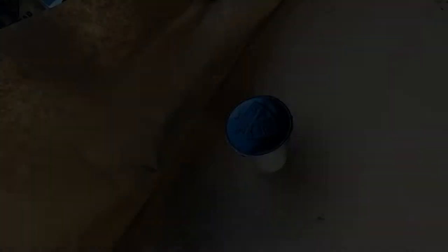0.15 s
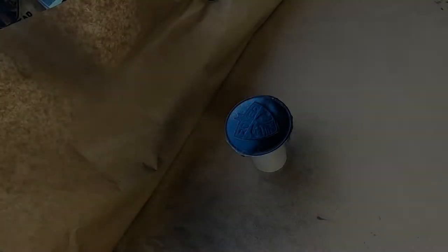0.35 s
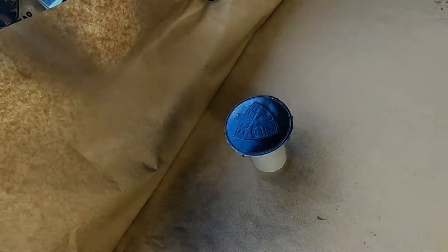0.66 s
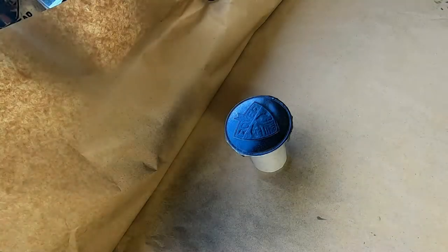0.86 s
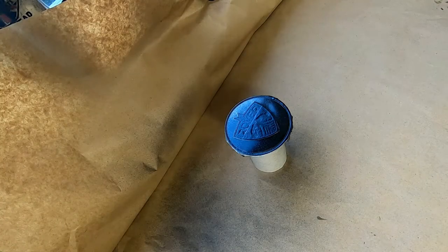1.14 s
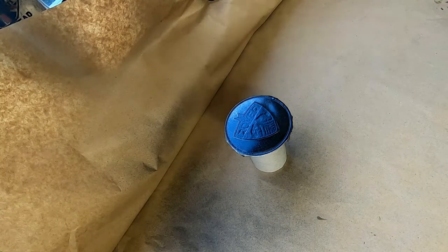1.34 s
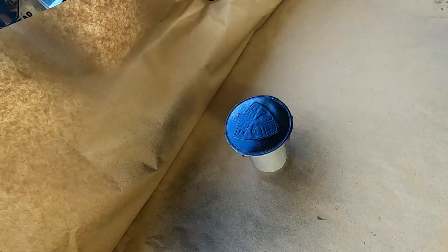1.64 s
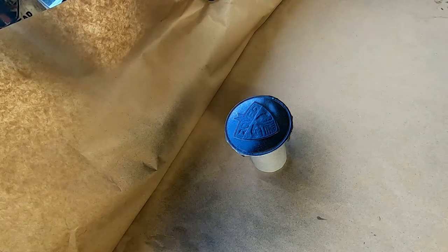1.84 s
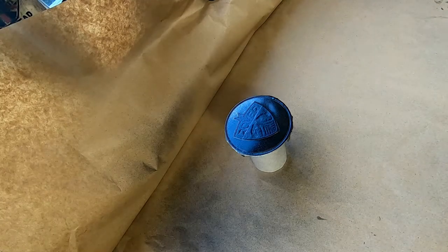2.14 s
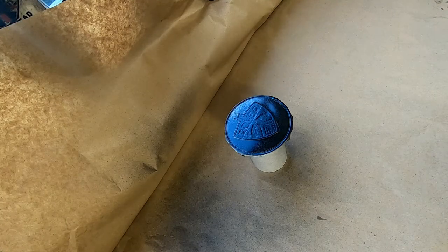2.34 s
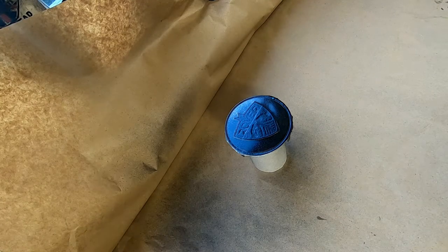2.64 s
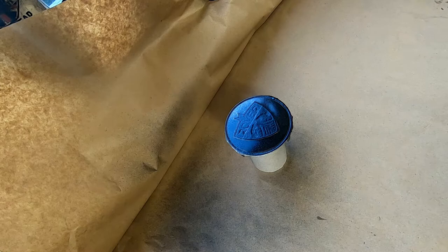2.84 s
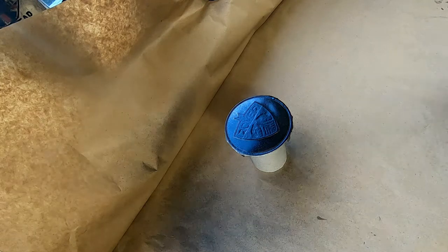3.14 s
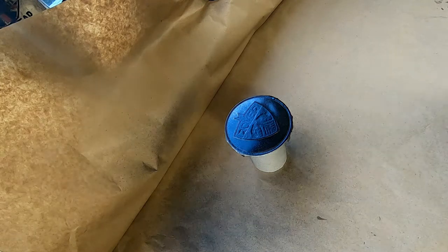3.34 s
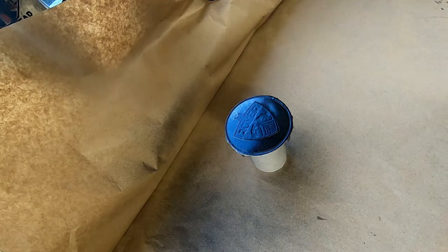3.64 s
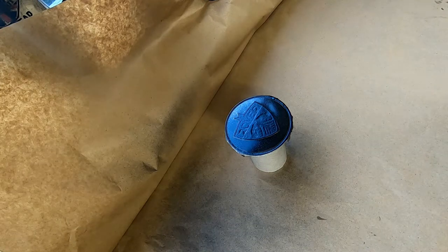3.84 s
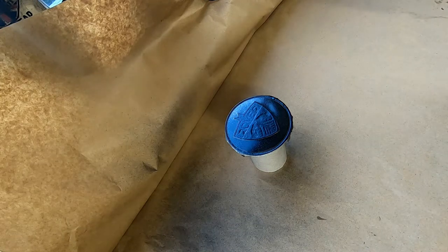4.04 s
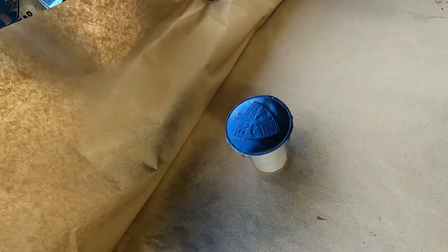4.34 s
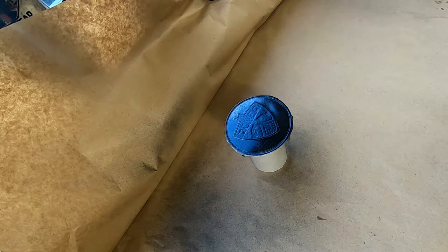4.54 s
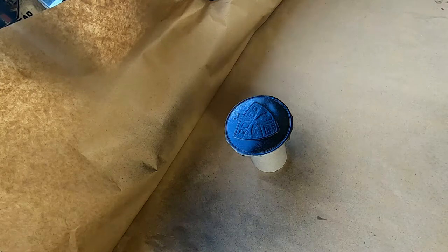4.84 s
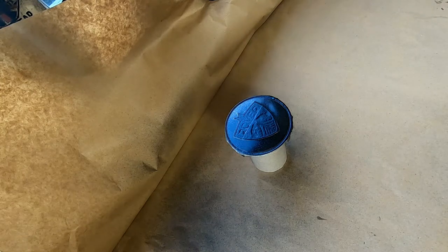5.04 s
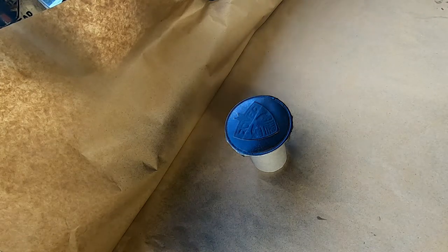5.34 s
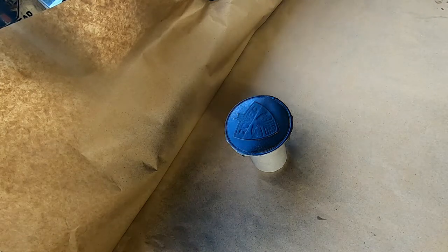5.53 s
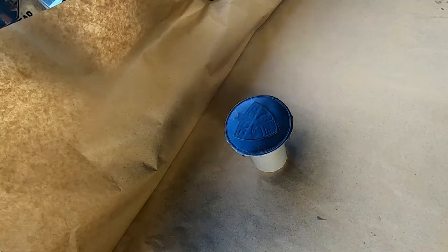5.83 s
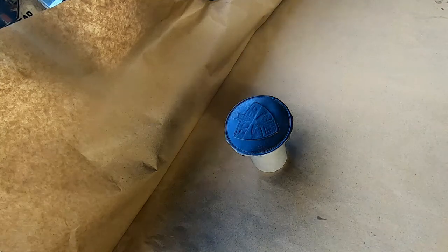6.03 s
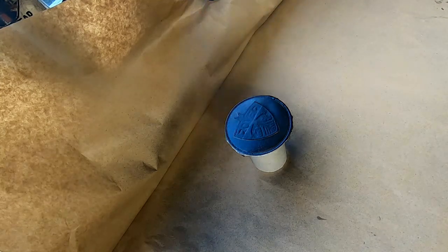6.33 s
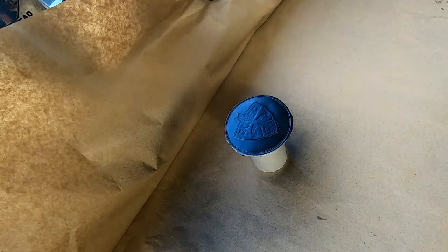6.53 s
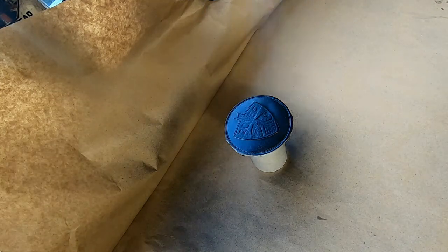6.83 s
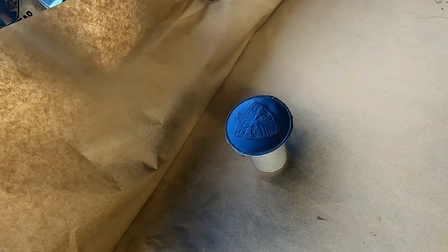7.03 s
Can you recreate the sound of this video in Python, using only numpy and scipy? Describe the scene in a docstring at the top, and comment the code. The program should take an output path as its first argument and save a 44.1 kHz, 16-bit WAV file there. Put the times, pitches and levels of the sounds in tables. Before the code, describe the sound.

A spray paint can is shaken twice, its mixing ball clacking, then sprayed in five short hisses in a small workshop.

```python
"""A small workshop, with a spray paint can close to the microphone and a little to the right.
Faint room noise and a low hum lie under the scene and drop out briefly at the start. From 0.3 s the can
is tilted, then shaken in two spells: the mixing ball rolls in the paint and clacks on the steel.
From 4.7 s five short bursts of turbulent spray hiss at a cap standing on paper on the table;
between them the can tilts and the ball tumbles. The walls answer with a short decay."""
import sys
import numpy as np
from scipy import signal
from scipy.fft import rfft, irfft, next_fast_len
from scipy.io import wavfile
from scipy.ndimage import uniform_filter1d

SR = 44100
rng = np.random.default_rng(int(sys.argv[2]) if len(sys.argv) > 2 else 0)


def to_wav(s):
    """Save 16-bit WAV."""
    ch = np.atleast_2d(s).T  # columns
    pcm = np.round(np.clip(ch, -1, 1) * 32767)  # PCM
    wavfile.write(sys.argv[1], SR, pcm.astype(np.int16))


N = 316620
TIME = np.arange(N) / SR


def amp(db):
    """Decibels to gain."""
    return np.exp(np.asarray(db) * (np.log(10) / 20))

def unit(x):
    """Scale to rms 1."""
    return x / np.sqrt(np.mean(x ** 2) + 1e-20)

def along(points, hz):
    """Read (freq_hz, value) points along a log frequency axis."""
    freqs, values = np.transpose(points)
    return np.interp(np.log(hz + 1), np.log(freqs + 1), values)

def wobble(rate):
    """A random curve with rate knots a second."""
    knots = rng.standard_normal(2048)
    return np.interp(TIME * rate, np.arange(len(knots)), knots)

def swell(start, length, rise_s, release_s):
    """Rise softly, hold, and fall 60 dB in release_s."""
    t = TIME - start
    rise = np.sin(np.pi / 2 * np.clip(t / rise_s, 0, 1)) ** 2
    return rise * amp(-60 * np.maximum(t - length, 0) / release_s)

def bell_curve(centre_s, sigma_s):
    """A Gaussian rise and fall."""
    return np.exp(-.5 * ((TIME - centre_s) / sigma_s) ** 2)

def filtered(x, response):
    """Pass x through a complex frequency response."""
    n = x.shape[-1]
    padded = next_fast_len(n + 4096, True)
    return irfft(rfft(x, padded) * response(np.fft.rfftfreq(padded, 1 / SR)), padded)[..., :n]

def coloured(x, colour):
    """Shape x with a (freq_hz, gain_db) curve."""
    return filtered(x, lambda f: amp(along(colour, f)))

def resonances(modes, f):
    """Causal response of (pitch_hz, width_hz, gain_db) modes of alternating sign."""
    return sum((-1) ** k * amp(db) * 1j * f * width / (hz * hz - f * f + 1j * f * width)
               for k, (hz, width, db) in enumerate(modes))

def narrow_noise(hz, width_hz):
    """Noise of rms 1 in one resonance."""
    return unit(filtered(rng.standard_normal(N), lambda f: resonances([(hz, width_hz, 0)], f) ** 2))

def stereo_noise(colour, side_db):
    """Coloured noise of rms 1, alike left and right but for a side part."""
    mid, side = rng.standard_normal((2, N))
    side *= amp(side_db)
    return unit(coloured(np.array([mid + side, mid - side]), colour))

def add(track, start_s, sound):
    """Mix a sound into a track."""
    part = track[round(start_s * SR):][:len(sound)]
    part += sound[:len(part)]

def struck(force, modes, spread_db, detune):
    """Contact point, grip and sloshing paint give each blow its own mix of modes; energy 1."""
    chance = rng.standard_normal((len(modes), 2))
    varied = [(hz * np.exp(detune * a), width, db + spread_db * b)
              for (hz, width, db), (a, b) in zip(modes, chance)]
    ring = filtered(force, lambda f: resonances(varied, f))
    return ring / np.linalg.norm(ring)

def force_db(wall_db, dome_db, ring_db):
    """Strength of a hit: wall, dome and favoured mode together."""
    return wall_db + 10 * np.log10(1 + amp(dome_db) ** 2 + amp(ring_db) ** 2)


# The quiet workshop at the microphone: freq_hz, gain_db
AIR_COLOUR = [(20, -29.5), (60, -12.5), (100, -18), (130, -3), (200, -5.5), (340, -12), (450, -18.5),
              (1000, -18.5), (4200, -31), (6000, -38), (10500, -44), (12500, -80)]
def room_noise(level_db=-64):
    """Faint steady noise, wider in the bass than in the treble."""
    mid, side = unit(coloured(rng.standard_normal((2, N)), AIR_COLOUR))
    side = coloured(side, [(100, -8), (1200, -22)])
    return amp(level_db) * np.array([mid + side, mid - side])

# Swells of the hum, dead centre: centre_s, sigma_s, level_db
HUM_RISES = [(1.722, 0.021, -56), (2.05, 0.043, -50), (4.935, 0.033, -59), (5.25, 0.039, -55),
             (5.535, 0.06, -56.5)]
def hum(pitch_hz=131, drift_hz=3, rest_db=-73.5, waver_db=4):
    """A low wavering tone that swells now and then."""
    level = amp(rest_db + waver_db * wobble(9.6))
    level += sum(amp(db) * bell_curve(s, sigma) for s, sigma, db in HUM_RISES)
    phase = 2 * np.pi * np.cumsum(pitch_hz + drift_hz * wobble(25)) / SR
    return level * np.sqrt(2) * np.sin(phase)

def background(gap_start_s=0.041, gap_end_s=0.27, fade_s=0.059):
    """Room noise and hum drop out briefly, then fade back in."""
    fade = (TIME < gap_start_s) + np.clip((TIME - gap_end_s) / fade_s, 0, 1)
    return fade * (room_noise() + hum())


# The can tilts and the ball rolls along it: start_s, length_s, level_db, rise_s
CAN_TILTS = [(0.28, 0.29, -68, 0.062), (0.59, 0.15, -44, 0.03), (2.188, 0.26, -49, 0.037),
             (2.454, 0.31, -60, 0.036), (2.809, 0.15, -43.5, 0.053), (3.113, 0.25, -55, 0.08),
             (5.08, 0.086, -49, 0.03), (5.486, 0.094, -53, 0.033), (6.473, 0.068, -52.5, 0.026),
             (6.6, 0.13, -51, 0.027), (7.07, 0.047, -53, 0.027)]
# The ball's rasp from close by: freq_hz, gain_db
RASP_COLOUR = [(100, -20), (500, -14), (1050, -6), (1600, 4), (2100, 2.5), (2650, 3.5), (3200, 1.5),
               (4650, -2.5), (5800, -14.5), (7800, -14), (8700, -24.5), (10800, -28.5), (12000, -50.5),
               (14000, -71)]
def rolling(roll_on_db=-18.5, settle_t60_s=0.27, clump_db=2.5, grain_db=2, contact_share=.1):
    """At each tilt and after each hit the ball rolls on the wall: tiny contacts in uneven clumps."""
    kicks = np.zeros(N)
    for s, wall, dome, _, _, ring in BALL_HITS:
        kicks[round(s * SR)] = amp(force_db(wall, dome, ring) + roll_on_db) ** 2
    power = signal.lfilter([1], [1, -amp(-60 / (settle_t60_s * SR)) ** 2], kicks)
    power = abs(uniform_filter1d(power, size=256))
    for s, length, db, rise in CAN_TILTS:
        power += (amp(db) * swell(s, length, rise, release_s=0.46)) ** 2
    clumps = amp(clump_db * np.clip(wobble(130), -2, 2))
    grains = rng.standard_normal(N) * (rng.random(N) < contact_share)
    sizes = amp(grain_db * np.clip(rng.standard_normal(N), -2, 2))
    return np.sqrt(power) * unit(coloured(grains * clumps * sizes, RASP_COLOUR))


# The ball hits the can: start_s, wall_db, dome_db, tick_db, ring_hz, ring_db
# Dome (high when hit end-on), bright tick and ring (the favoured mode) are relative to the wall.
BALL_HITS = [(0.516, -45, -19, -9.5, 1910, 0), (0.538, -52, -27, -4, 1600, -4.0),
             (0.575, -39, 15, 7, 4550, 0), (0.587, -37, 9, 9.5, 4480, -5), (0.634, -46.5, 12, 6, 4610, 6.0),
             (0.665, -34.5, -10, -13, 1560, -7), (0.68, -34.5, 0, -2, 2800, -15),
             (0.749, -38.5, -3.5, -8.5, 1610, -2), (0.805, -41.5, -11, -23.5, 1790, -14),
             (0.835, -39, -9, -28, 1590, -2), (0.851, -43.5, -6, -25.0, 1570, 1),
             (0.89, -39.5, 4, 1, 4500, -12), (0.919, -30, 2, -8, 4290, -13),
             (0.949, -30.5, -27, -19.5, 1410, -1.5), (0.963, -30.5, -7, -21, 1574, 1),
             (0.983, -40, -17, -23.0, 1420, 3), (1.01, -40.5, 0.0, -7, 4450, 0.5),
             (1.061, -32, -12.5, -25, 1870, -12), (1.082, -27.5, -8, -22, 2700, 0),
             (1.119, -37.5, -13.5, -35, 1650, 3.5), (1.208, -29, -6, -6, 2740, 2),
             (1.215, -24.5, 0, -2.5, 2680, 3.5), (1.245, -30.5, -11, -14, 1520, 8.5),
             (1.276, -27.5, -12.5, -21, 2720, -23.5), (1.288, -32, -9, -9, 4600, -0.5),
             (1.311, -46, -14.5, -13, 1540, 5), (1.347, -33, -5.5, -15, 1390, 2),
             (1.37, -34, -13, -15, 1660, -9.5), (1.386, -36, -16, -7.5, 1640, -5.5),
             (1.418, -30, 4, 0, 4720, 0), (1.452, -28, -4, -26, 1524, 1.5),
             (1.475, -35.5, -7, -21, 1500, 6), (1.526, -20.5, 0.5, -3.5, 4390, -10.5),
             (1.546, -28.0, -2, -5.5, 4630, 1.5), (1.603, -24.5, -25, -28.5, 1670, -6.5),
             (1.656, -27.0, -8.5, -47, 1210, -2.5), (1.732, -36.5, -5.5, -31, 1770, 6.5),
             (1.761, -36, -21, -7, 1610, 2.5), (1.78, -32, 0.5, -3, 4850, 2.5),
             (1.883, -39.5, -3, -18.0, 1730, -5), (1.917, -37, -1.5, -17, 4720, -5),
             (1.928, -46.5, 2, -12, 1720, 5), (1.968, -52.5, 7, -2, 4700, 2.5),
             (2.003, -31.5, -1, -8, 4230, -8.5), (2.041, -41.5, -11, -18, 1620, 4),
             (2.047, -39.5, 0.0, -12, 4900, 0), (2.156, -32, -4.0, -17, 4700, -6),
             (2.188, -46, 6.5, -3.5, 1640, 7), (2.244, -52, -1, -12.5, 1490, 3),
             (2.264, -47.5, -6, -23, 1950, 2), (2.351, -40.5, -3, -16, 1600, 2.5),
             (2.383, -51, -11, -21, 1660, 1.5), (2.416, -48, -1, -15.5, 1510, -3),
             (2.619, -54.5, -2.5, -17, 3270, -2), (2.856, -53, 1, -10.5, 2480, -6.5),
             (2.9, -65.5, 19, -4, 2510, 8), (2.925, -64, 2, -9.0, 3250, -1),
             (2.95, -40.5, 2, -3.5, 3340, 2), (2.981, -52.5, 8.5, -7, 1720, 0),
             (3.305, -37, -10, -6, 3130, -8.5), (3.331, -28, -20.5, -13, 1580, -6.5),
             (3.347, -30, -8, -14.5, 3200, -7.5), (3.385, -20.5, 0.5, -4, 1600, -3),
             (3.39, -28, 1.5, -16, 2870, 2), (3.494, -28.5, -3, -5.5, 3820, 0),
             (3.507, -28.5, 8.5, -4, 4180, 9.5), (3.518, -36.5, 19, 9.5, 4530, 1.5),
             (3.531, -34.5, 2.5, -1.5, 4610, -11), (3.576, -29, 0.5, -22, 1980, -8),
             (3.588, -23.5, -5.5, -12, 3380, -7.5), (3.619, -23, -1.5, 0.5, 1560, -2.5),
             (3.632, -23.5, -7.5, -8.5, 4400, -0.5), (3.643, -28, -3.5, -18.5, 4600, -9.5),
             (3.653, -24.0, -5, -25, 2010, -4.5), (3.757, -30.5, 10.5, 8, 4800, 4),
             (3.782, -35, 13.5, -14.5, 4200, 9.5), (3.861, -29, -0.5, -21, 1790, -17),
             (3.881, -21.5, -3.5, -12.5, 2800, -3.5), (3.89, -35.5, 7.5, -3.5, 4110, -1),
             (3.933, -31, 7.5, -4.5, 4700, 3), (3.945, -33.5, -19, -12.5, 4410, -10.5),
             (4.051, -25.5, -18, -19, 1610, -2.5), (4.08, -31, 5.5, 7, 4700, 8),
             (4.104, -35.5, 3, -23.0, 4100, 12), (4.115, -28.5, -1, -21.5, 1860, -5),
             (4.146, -26.5, -5.5, -30.5, 1950, -9.5), (4.169, -41.0, -11.5, -19.5, 1920, 2.5),
             (4.217, -40, -11.5, -20.5, 1760, 3), (4.231, -25.5, 2.5, -19.5, 3100, -11.5),
             (4.266, -27, 0.5, -15, 2710, 1.5), (4.364, -35.5, -4, -34, 2900, -14),
             (4.436, -29, -3.5, -15, 2790, -10), (4.468, -38, -10.5, -22, 1780, -9),
             (4.487, -40.5, -5, -23, 1660, -15), (4.523, -46, -11, -16, 1950, -18),
             (4.567, -44, -2.0, -18, 2710, -3), (4.621, -44.5, 3.5, -15, 1970, 1),
             (4.667, -37, -2, -14.5, 2710, -3), (5.042, -41, 1.5, -9, 4480, -7.5),
             (5.074, -36.5, 0.5, -17, 4600, -6), (5.126, -43, -3.0, -9, 1400, 2),
             (5.161, -51.5, 2, -2.0, 1610, 3.5), (5.526, -47.5, -1, -10, 2740, -5),
             (5.567, -40.0, 2, -8.5, 4470, 3.5), (5.603, -43.5, -2, -13, 4460, -1),
             (5.629, -50, 1, -3, 1720, 1), (6.063, -50, 1.5, -12, 2820, -0.5),
             (6.619, -38.5, 1.5, -13, 1960, -5), (6.67, -46, -5, -3, 1910, -2),
             (6.701, -46, -5, -13.5, 2970, -2), (6.739, -48.5, -3, -18.5, 1670, -5.5),
             (7.104, -51, 0, -4, 1710, 3)]
# The can's wall, damped by paint and hand: pitch_hz, width_hz, gain_db
WALL_MODES = [(173, 36, -14.5), (282, 37, -31.5), (748, 350, -9.5), (1216, 233, -2.5), (1646, 203, 3),
              (2117, 357, 1), (2710, 320, -0.5)]
# Its domed end: pitch_hz, width_hz, gain_db
DOME_MODES = [(2990, 1000, -10.5), (3844, 940, 1), (4542, 580, 5.5), (4763, 333, 3), (4980, 410, -12),
              (6570, 1650, -15.5)]
# Tone of the ball's bright ticks and the can's clack: freq_hz, gain_db
TICK_TONE = [(100, -45), (1000, -20.5), (5000, 7.5), (6800, 6), (7900, -1), (8600, -22), (9500, -5),
             (11000, -9.5), (11800, -51), (13000, -53.5), (15000, -70)]
CLACK_TONE = [(60, -12.5), (200, 2), (7500, 0), (8700, -32.5), (11000, -16.5), (12000, -53), (14000, -88.5)]
# The can's jolt in the hand, close up: freq_hz, gain_db
JOLT_COLOUR = [(40, -16), (80, -22), (125, -5.5), (230, 1), (330, 6), (450, -1), (700, -3.5), (1200, -19.5),
               (3000, -54.5)]
def clacks(gain_db=26, dome_gain_db=27, jolt_db=33.5, skid_db=-13, chatter_db=-15):
    """The ball skids, hits and chatters on the steel; hard end-on throws skid most and jolt the can."""
    lead_s, contact_s, skid_s, chatter_t60_s, snap_t60_s = .02, .0013, 0.075, 0.029, 0.12
    body, ticks, jolts = np.zeros((3, N))
    t = np.arange(4096) / SR - lead_s
    bounces = (t >= 0) * amp(chatter_db - 60 * abs(t) / chatter_t60_s)
    impact = np.arange(len(t)) == np.argmin(abs(t))
    for s, wall, dome, tick, hz, ring in BALL_HITS:
        start = s + contact_s - lead_s
        strength_db = force_db(wall, dome, ring)
        grit = rng.standard_normal(len(t))
        skid_peak_db = skid_db + 0.59 * strength_db + 0.15 * min(dome, 0)
        skid = (t < 0) * grit * amp(skid_peak_db - 60 * abs(t) / skid_s)
        hit = 0.86 * impact + grit * bounces
        snap = 0.45 * impact + grit * bounces * amp(-60 * abs(t) / snap_t60_s)
        # The contact point favours one mode, which the seam splits into a pair.
        width_hz = 110 + 0.031 * hz
        pair = [(hz + side * 0.36 * width_hz, width_hz, 0) for side in (-1, 1)]
        clack = amp(gain_db) * struck(skid + hit, WALL_MODES, spread_db=2, detune=0.018)
        clack += amp(dome + dome_gain_db) * struck(skid + hit, DOME_MODES, spread_db=2.5, detune=0.029)
        clack += amp(ring + gain_db) * struck(1.5 * skid + hit, pair, spread_db=5.5, detune=0.003)
        add(body, start, amp(wall) * clack)
        add(ticks, start, amp(wall + tick + gain_db) * snap / np.linalg.norm(snap))
        add(jolts, start, amp(jolt_db + 1.88 * strength_db) * hit / np.linalg.norm(hit))
    return coloured(ticks, TICK_TONE) + coloured(body, CLACK_TONE) + coloured(jolts, JOLT_COLOUR)


# Soft knocks of handling: start_s, level_db, scuff_t60_s
KNOCKS = [(0.69, -31, 0.073), (0.715, -24, 0.063), (0.727, -30.5, 0.08), (0.737, -26.5, 0.12),
          (0.767, -31, 0.11), (2.266, -40, 0.14), (2.286, -37, 0.18), (2.313, -40.5, 0.1)]
# Their dull resonances: pitch_hz, width_hz, gain_db
KNOCK_MODES = [(180, 45, 0), (270, 63, -1.5), (417, 110, 3.5), (547, 1120, -4)]
def handling_knocks(gain_db=13, scuff_db=-27):
    """Each knock on the can is a push and a short scuff."""
    out, t = np.zeros(N), np.arange(8192) / SR
    for s, db, t60 in KNOCKS:
        push = (t == 0) + rng.standard_normal(len(t)) * amp(scuff_db - 60 * t / t60)
        add(out, s, amp(db + gain_db) * struck(push, KNOCK_MODES, spread_db=0, detune=0.035))
    return coloured(out, CLACK_TONE)

# The ball runs round the base: start_s, length_s, level_db, rise_s
BASE_LAPS = [(1.5, 0.45, -56, 0.2), (2.33, 0.17, -51.5, 0.06)]
def circling():
    """The circling ball makes a mode of the wall sing."""
    level = sum(amp(db) * swell(s, length, rise, release_s=0.46) for s, length, db, rise in BASE_LAPS)
    return level * narrow_noise(hz=1600, width_hz=170)


def valve(start, length, db, press_s=0.091, lift_s=0.041, choke_db=-8):
    """The finger works the valve: the flow, and its choke from 1 (barely open) to 0 (fully open)."""
    choke = 1 - np.clip(np.minimum((TIME - start) / press_s, (start + length - TIME) / lift_s), 0, 1)
    flow = amp(db + choke_db * choke) * swell(start, length, rise_s=0.042, release_s=0.043)
    return flow, choke

def turbulence(hiss, sputter_db=1.07, flutter_db=1.5, patch_db=2.5):
    """The paint flows unevenly, and patches of the spectrum swell and fade on their own."""
    uneven = hiss * amp(sputter_db * wobble(170) + flutter_db * wobble(32))
    spectrum = signal.stft(uneven, nperseg=512)[2]
    patches = uniform_filter1d(rng.standard_normal(spectrum.shape[1:]), size=4, axis=0)
    patches = uniform_filter1d(patches, size=10, axis=1)
    return signal.istft(spectrum * amp(patch_db * unit(patches)), nperseg=512)[1][:, :N]

# Presses of the nozzle, close to the microphone; sizzle and nozzle are relative to the jet:
# start_s, length_s, jet_db, sizzle_db, nozzle_db, table_echo_s
PRESSES = [(4.669, 0.21, -33.5, -16, 4, 0.00099), (5.191, 0.2, -32, -11, 0, 0.0016),
           (5.738, 0.19, -32, -13.5, 0, 0.0014), (6.294, 0.16, -31, -14.5, -28.5, 0.0015),
           (6.861, 0.16, -32, -16, -7, 0.0018)]
# The jet, its blowing on the cap and the sizzle of its droplets: freq_hz, gain_db
JET_COLOUR = [(60, -44), (400, -7), (950, -12.5), (1450, 1.5), (1850, -1.5), (2400, 4), (3100, 0),
              (4400, 3), (6000, -5), (7400, -1.5), (8700, -9), (12500, -14), (14500, -38.5)]
BLOW_COLOUR = [(40, -55), (85, -20), (140, -2.5), (330, -4), (480, -9.5), (700, -0.5), (950, -6),
               (1500, -5.5), (4000, -57)]
SIZZLE_COLOUR = [(8000, -10), (10500, -7), (11500, 2.5), (12700, 5), (13300, 4), (13900, -22),
                 (15000, -18.5)]
def spray(blow_db=-9.5, dull_hz=5450, dull_db=-4.5, mist_hz=12000, mist_db=-11.5, sizzle_pan_db=2):
    """A jet of sizzling droplets blows on the cap; a barely open valve loses treble and finest mist."""
    jet, treble, blow, sizzle, mist = np.zeros((5, N))
    for s, length, db, sizzle_db, _, _ in PRESSES:
        flow, choke = valve(s, length, db)
        droplet_flow = flow * amp(sizzle_db - choke)
        jet += flow
        treble += flow * amp(dull_db * choke)
        blow += flow * amp(blow_db - 7.5 * choke)
        sizzle += droplet_flow
        mist += droplet_flow * amp(mist_db * choke)
    rush = stereo_noise(JET_COLOUR, side_db=-18)
    body = filtered(rush, lambda f: 1 / (1 + (f / dull_hz) ** 4))
    hiss = jet * body + treble * (rush - body)
    hiss += blow * stereo_noise(BLOW_COLOUR, side_db=-14.5)
    droplets = stereo_noise(SIZZLE_COLOUR, side_db=-1)
    coarse = filtered(droplets, lambda f: 1 / (1 + (f / mist_hz) ** 24))
    hiss += amp([[sizzle_pan_db], [-sizzle_pan_db]]) * (sizzle * coarse + mist * (droplets - coarse))
    return turbulence(hiss)

def with_near_echoes(hiss, table_gain=0.14, drift_s_per_s=0.0009, cap_gain=0.086, cap_lag_s=0.00037):
    """Table and cap reflect the jet; the hand draws back, so the comb of the table's echo slides."""
    lag = np.zeros(N)
    for s, *_, echo_s in PRESSES:
        lag = np.where(TIME > s, echo_s + drift_s_per_s * (TIME - s), lag)
    table = np.array([np.interp(TIME - lag, TIME, channel) for channel in hiss])
    cap = np.array([np.interp(TIME - cap_lag_s, TIME, channel) for channel in hiss])
    return hiss + table_gain * table + cap_gain * cap

def nozzle_resonance(gain_db=-11):
    """The flow rings the nozzle, which stands out more while the valve is barely open."""
    level = np.zeros(N)
    for s, length, db, _, nozzle_db, _ in PRESSES:
        flow, choke = valve(s, length, db)
        level += flow * amp(gain_db + nozzle_db + 3 * choke)
    return level * narrow_noise(hz=2500, width_hz=190)

# Whistles within the bursts: centre_s, pitch_hz, level_db, sigma_s
JET_WHISTLES = [(4.784, 7070, -38, 0.014), (6.408, 4280, -33.5, 0.016)]
def whistles():
    """The jet briefly whistles in a narrow band."""
    return sum(amp(db) * bell_curve(s, sigma) * narrow_noise(hz, width_hz=70)
               for s, hz, db, sigma in JET_WHISTLES)

# The button, just ahead of the last three bursts: start_s, level_db
BUTTON_TOUCHES = [(5.721, -39), (6.273, -51), (6.839, -39.5)]
def button_ticks(gain_db=10, t60_s=0.058):
    """The finger takes up the nozzle's play with a faint tick."""
    out, t = np.zeros(N), np.arange(8192) / SR
    modes = [(2720, 610, -1), (4200, 870, -9)]  # pitch_hz, width_hz, gain_db
    for s, db in BUTTON_TOUCHES:
        push = rng.standard_normal(len(t)) * amp(-60 * t / t60_s)
        add(out, s, amp(db + gain_db) * struck(push, modes, spread_db=2, detune=0.075))
    return coloured(out, CLACK_TONE)


# What the workshop's walls send back to the microphone: freq_hz, gain_db
REVERB_COLOUR = [(150, 3), (1000, -0.5), (1600, -2), (4600, -2), (6000, -1), (7500, 1), (11000, 6)]
# Its decay: freq_hz, t60_s
REVERB_DECAY = [(150, 0.43), (1500, 0.46), (4500, 0.44), (9000, 0.31), (14000, 0.18)]
# Its stereo width: freq_hz, side_db
REVERB_WIDTH = [(150, -13.5), (600, -12), (1200, -18.5), (4500, -17), (9000, -4.5)]
def workshop_reverb(source, delay_s=.004, hop=22050):
    """A short, diffuse room decay; a fresh random tail every half second keeps it from ringing."""
    source = coloured(source, REVERB_COLOUR)
    out = np.zeros((2, N))
    fade = np.sqrt(np.hanning(2 * hop))
    for start in range(0, N, hop):
        hz, t, spectrum = signal.stft(rng.standard_normal((2, SR // 2)), SR, nperseg=256)
        spectrum *= amp(-60 * t / along(REVERB_DECAY, hz)[:, None])
        spectrum[1] *= amp(along(REVERB_WIDTH, hz))[:, None]
        tail = signal.istft(spectrum, SR, nperseg=256)[1]
        piece = source[start:start + 2 * hop] * fade[:N - start]
        mid, side = signal.fftconvolve(piece[None], tail / np.linalg.norm(tail[0]), axes=1)
        add(out[0], start / SR + delay_s, mid + side)
        add(out[1], start / SR + delay_s, mid - side)
    return out

def scene(can_wet_db=-6.5, jet_wet_db=-11):
    """Can and jet close to the microphone, a little to the right; the nozzle's resonance stays dry."""
    can = clacks() + rolling() + circling() + handling_knocks() + button_ticks()
    jet = with_near_echoes(spray()) + whistles()
    nozzle = nozzle_resonance()
    walls = workshop_reverb(amp(can_wet_db) * can + amp(jet_wet_db) * jet.mean(0))
    balance = amp([[-.28], [.28]])
    return (can + jet + nozzle + walls + background()) * balance

def record(dry):
    """The stereo microphone's chain passes nothing above 15 kHz."""
    return filtered(dry, lambda hz: hz < 15000)


dry = scene()
out = record(dry)
to_wav(out)
```